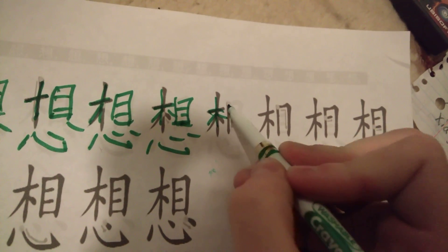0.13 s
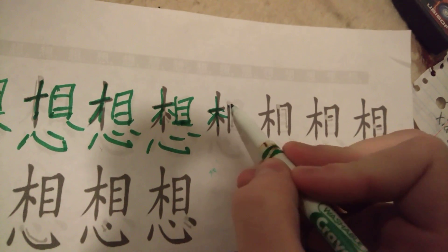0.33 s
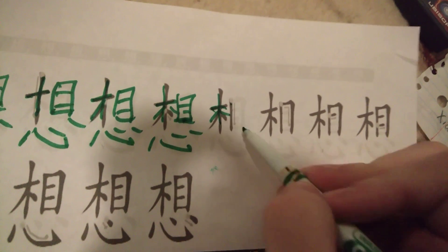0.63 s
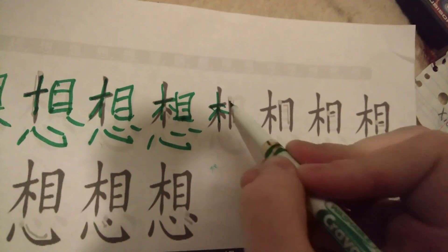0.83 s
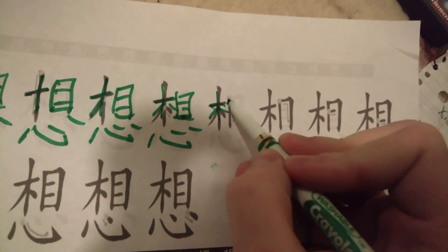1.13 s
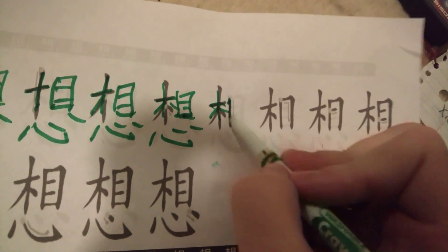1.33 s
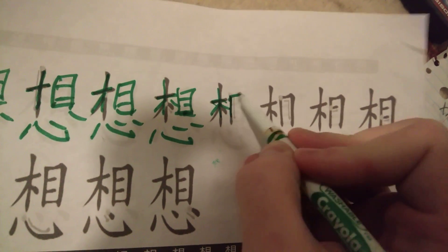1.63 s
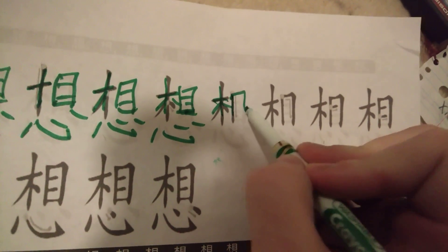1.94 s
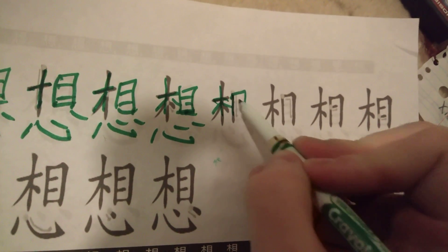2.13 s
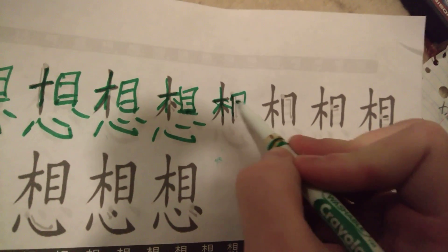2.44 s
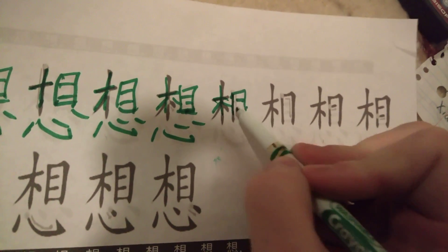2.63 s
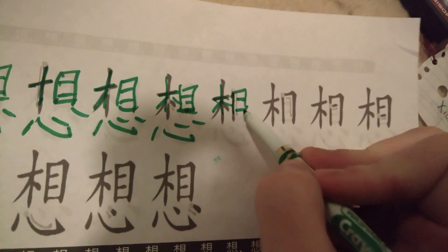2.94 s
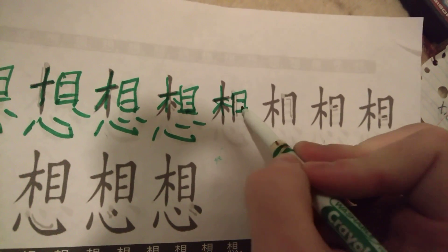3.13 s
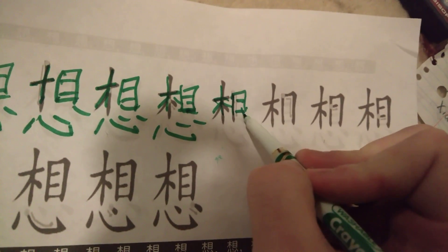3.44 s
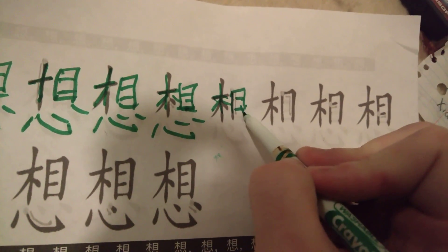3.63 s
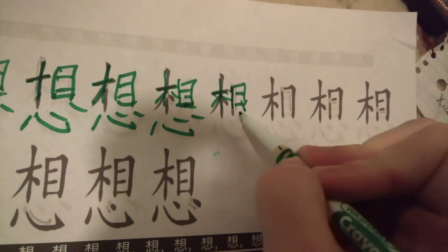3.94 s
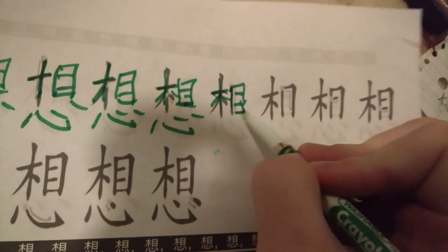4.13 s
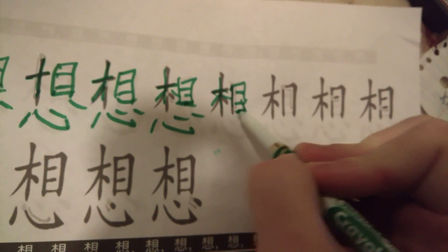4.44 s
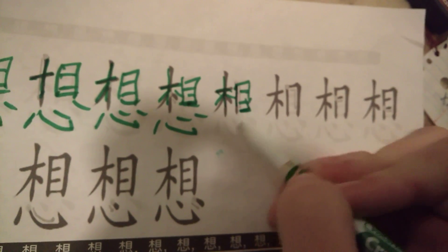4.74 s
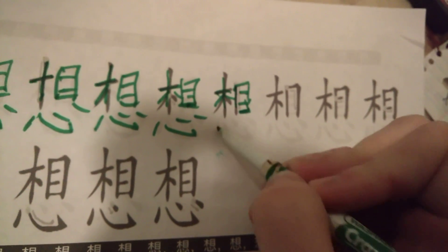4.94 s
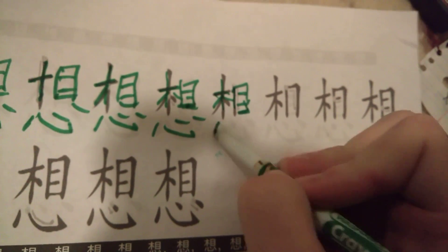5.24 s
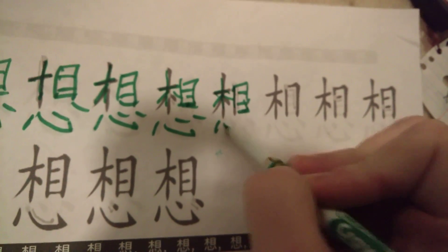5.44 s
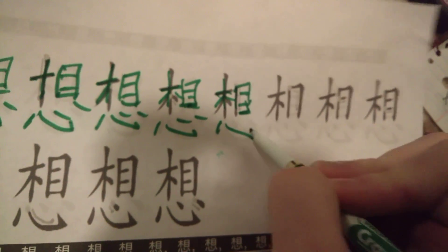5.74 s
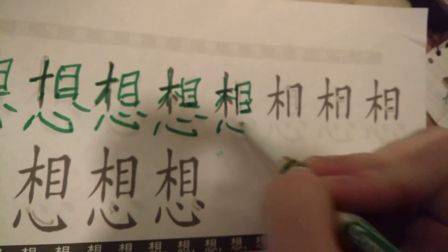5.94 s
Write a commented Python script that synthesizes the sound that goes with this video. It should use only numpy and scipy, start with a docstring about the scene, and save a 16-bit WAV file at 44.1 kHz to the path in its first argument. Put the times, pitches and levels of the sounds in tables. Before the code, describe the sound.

In a quiet room, close and to the left of the microphone, a marker scratches across paper in brief, uneven strokes. The first few are clear, the middle ones lighter and now and then juddering, and the last ones duller, with crisp taps of the tip. Between strokes the side of a hand slides over the sheet with a soft hiss, above a faint low hum.

```python
"""Felt-tip marker on paper

A marker writes a character in short strokes on a sheet lying on a desk. Its tip catches on the
fibres and shakes the sheet, now and then chattering. The side of the hand slides over the paper
with a soft hiss, and tip and sheet tick. All is close to the left microphone, in a quiet room."""
import sys
import numpy as np
from scipy import signal
from scipy.fft import rfft, irfft, next_fast_len
from scipy.io import wavfile
from scipy.ndimage import uniform_filter1d

SR = 44100
rng = np.random.default_rng(int(sys.argv[2]) if len(sys.argv) > 2 else 0)


def generate_wav(signal):
    """Clip the signal to [-1, 1] and save it as 16-bit WAV at the path in sys.argv[1]."""
    frames = np.transpose(np.atleast_2d(signal))
    scaled = np.clip(frames, -1, 1) * 32767
    pcm = np.round(scaled).astype(np.int16)
    wavfile.write(sys.argv[1], SR, pcm)


N = 268286
TIME = np.arange(N) / SR

# Levels in the tables are relative: later gains set the final loudness.
# marker strokes: t/s, speeding up/s, slowing/s, level/dB, brightness/(dB per octave),
# pressure on the desk/dB, fibre hiss/dB, chatter/(0-1)
MARKER_STROKES = [(1.146, 0.019, 0.098, -54.5, -6, -0.5, -20, 0.13),
                  (1.299, .072, 0.054, -31.5, 0, -13.5, -8.5, 0),
                  (1.646, 0.011, 0.088, -37, 7, -11.5, -5.5, 0.13),
                  (1.759, 0.081, 0.068, -30.5, -1, -12, -6.5, 0),
                  (1.934, 0.0066, 0.037, -52, -12, 7, 2.5, 0.1),
                  (2.475, 0.021, 0.06, -38.5, 0.5, -6, -8.5, 0.47),
                  (2.771, 0.039, 0.099, -43.5, 1, -6.5, -7, 0.75), (3.2, 0.1, 0.044, -51, -6, 0, -25, 0.06),
                  (3.367, .027, .023, -55, 1, -2.5, -8, 0), (3.43, 0.027, 0.042, -56, -1, 3.5, -5.5, 0),
                  (4.138, 0.035, 0.071, -41.5, 1.5, -2, -1, 0.7),
                  (4.237, 0.0336, 0.055, -44, -7, 4, -0.5, 0.71),
                  (4.332, 0.042, 0.033, -50, 2, 5.5, -3.5, 0),
                  (4.421, 0.035, 0.025, -43, 1, -10, 0.5, 0.12),
                  (4.556, 0.033, 0.044, -45, -0.5, -0.5, -0.5, 0.2),
                  (5.172, 0.04, 0.027, -51, -8, -10.5, 3.5, 0.03),
                  (5.237, .03, 0.074, -43, -11.5, -2.5, 7.5, 0.37),
                  (5.432, 0.12, 0.067, -37.5, -6, -1, 2.5, 0.18),
                  (5.575, 0.039, 0.061, -45, -7.5, -0.5, -3.5, 0.2),
                  (5.7033, 0.0027, 0.018, -32.5, -6, -3.5, -3, 0.2),
                  (5.715, 0.015, 0.057, -33.5, -12.5, 0, -3.5, 0.04)]
# pitches at which the sheet and marker ring: f/Hz, width/Hz, level/dB
SHEET_RESONANCES = [(913, 350, -2.5), (1172, 136, 3.5), (1410, 710, 2), (1750, 400, -3.5), (2313, 250, -6),
                    (2770, 440, -15), (3300, 88, -6), (4480, 120, -7)]
# the desk ringing under a pressed tip: f/Hz, width/Hz, level/dB
DESK_RESONANCES = [(246, 230, -9), (363, 124, 4), (447, 96, 4.5), (531, 126, -4)]
# tone of the hissing fibres: f/Hz, level/dB
FIBRE_TONE = [(1500, -18), (3000, 1.5), (4100, 0.5), (4700, -5.5), (5500, 2.5), (6000, -1.5), (6600, -0.5),
              (7500, 0), (8700, -1), (10300, 0), (11200, -13), (13500, -7.5), (16000, -14)]
# tone of the felt nib's own high ring: f/Hz, level/dB
NIB_TONE = [(7000, -11), (8800, -39), (9500, 4.5), (10100, 3), (10500, 2), (10900, -8), (11600, -5),
            (13500, -10), (14800, -12), (16000, -14)]
# ticks of tip and sheet: t/s, level/dB, f/Hz
PAPER_TICKS = [(.105, -47, 3400), (1.063, -32, 1900), (1.6177, -14, 2480), (1.891, -38, 6960),
               (1.939, -34, 1450), (3, -41.5, 4350), (3.349, -37, 3900), (3.433, -41.5, 3300),
               (3.984, -27.5, 4760), (4.496, -37.5, 4960), (4.61, -30.5, 4410), (4.7167, -36.5, 2660),
               (4.881, -42, 2740), (5.208, -25.5, 1867), (5.361, -27.5, 1760), (5.442, -27.5, 1990),
               (5.474, -28.5, 1900), (5.5089, -19.5, 1570), (5.5343, -9, 2400), (5.5349, -9, 2050),
               (5.5369, -14, 1586), (5.7245, -15, 1330), (5.864, -32.5, 2650), (5.9405, -31, 1860)]
# the hand slides to a new place: t/s, length/s, level/dB
HAND_SLIDES = [(0.16, 0.14, -56.5), (0.43, 0.076, -58.5), (0.534, 0.17, -45.5), (0.67, 0.4, -51),
               (0.953, .14, -48.5), (1.057, 0.092, -53.5), (1.146, 0.095, -50.5), (1.28, 0.2, -45),
               (1.374, 0.25, -51), (1.551, 0.29, -47.5), (1.888, 0.26, -47.5), (2.086, 0.21, -55),
               (2.282, 0.11, -44.5), (2.41, 0.17, -52.5), (2.516, 0.18, -50), (2.689, 0.33, -45.5),
               (3.082, 0.39, -48.5), (3.781, 0.18, -52), (3.946, 0.091, -59.5), (4.063, 0.16, -44.5),
               (4.208, 0.59, -53.5), (4.488, 0.074, -47.5), (4.599, 0.23, -49), (4.802, 0.12, -50.5),
               (4.997, 0.23, -53), (5.143, 0.18, -44.5), (5.326, 0.078, -43.5), (5.429, .12, -48),
               (5.587, 0.48, -47), (5.985, 0.18, -42)]
# tone of skin rubbing on paper: f/Hz, level/dB
SKIN_TONE = [(200, -14), (700, -14.5), (1000, -11.5), (1500, -1.5), (2350, 1), (3100, -2), (3900, -5.5),
             (5500, -4.5), (7500, -9), (10600, -8.5), (12000, -15), (16000, -18.5)]
# the hand shifts its weight: t/s, half length/s, level/dB
HAND_BUMPS = [(2.85, .06, -60), (3.297, 0.14, -57.5), (3.787, 0.038, -55), (5.738, 0.098, -60)]
# the desk ringing under the hand: f/Hz, width/Hz, level/dB
BUMP_RESONANCES = [(66, 40, 0), (256, 78, -2.5), (366, 99, -7)]
# tone of the room's rumble: f/Hz, level/dB
ROOM_TONE = [(25, -11.5), (50, -3.5), (85, -3.5), (160, -7), (330, -8), (500, -16.5), (950, -22.5),
             (1700, -24), (3900, -30), (5400, -27), (8000, -36), (15000, -39)]
# muffling on the way from the desk to the right microphone: f/Hz, level/dB
RIGHT_SHADE = [(100, 0), (380, -30), (700, -15.5), (1300, -28), (2400, -23), (4400, -23), (8100, -51),
               (15000, -41)]

REST_DB = -66.5  # the hand is never quite still


def marker(lean_db=3.5, dull_db=1.5, hiss_power=1.4):
    """The tip catches on fibres and shakes sheet, desk and nib; a faster tip sounds brighter."""
    pace, drag, brightness, press, hiss, sheen, judder = np.zeros((7, N))
    for start, rise, fall, db, bright_db, press_db, hiss_db, chatter_amount in MARKER_STROKES:
        span, speed = stroke_speed(start, rise, fall)
        lean = undb(lean_db * np.linspace(-1, 1, len(speed)))  # starts light and hissy, ends pressed
        scratch = speed ** hiss_power * undb(db) / lean
        pace[span] = speed
        drag[span] += speed * undb(db)
        brightness[span] = bright_db - dull_db * (1 - speed)
        press[span] += speed * undb(db + press_db) * lean
        hiss[span] += scratch * undb(hiss_db)
        nib_db = hiss_db - 6.5 + 0.79 * bright_db  # the nib rings more in bright strokes
        sheen[span] += scratch * np.hypot(undb(nib_db), chatter_amount * undb(-1.5))
        judder[span] += speed ** 2 * undb(db) * chatter_amount * lean
    # fibres let go in little bunches, which makes the rub gritty
    bunches = stick_slip(rate=980, spread_db=24.0, release_s=0.00068)
    force = unit(3.0 + bunches) * undb(0.68 * wander(150))
    grip = unit((catches(rate=9000, spread_db=2.0) + 0.24 * noise()) * force)
    # each resonance is shaken by its own share of the fibres
    rings = [undb(db) * ring(grip + 2.37 * noise() * force, hz, width)
             for hz, width, db in SHEET_RESONANCES]
    sheet = sum(part * undb(brightness * np.log2(hz / 1600))
                for part, (hz, _, _) in zip(rings, SHEET_RESONANCES))
    sheet = sheet - ring(sheet, 4000, 710)  # the sheet is quiet between its upper resonances
    sheet = highpass(sheet, 670) / np.std(sum(rings)) * drag * undb(1.7)
    desk = unit(highpass(body(grip, DESK_RESONANCES), 250)) * press * undb(-3.5)
    fibres = unit(colour(grip + .5 * noise(), FIBRE_TONE)) * hiss * undb(0.23)
    nib = unit(colour(noise() * force, NIB_TONE)) * sheen * undb(1.5)
    return sheet + desk + fibres + nib + chatter(pace) * judder * undb(3.0)


def stroke_speed(start, rise, fall, full_speed_share=0.12):
    """The tip speeds up, holds its pace and slows. Gives the stroke's samples and its speed, 0-1."""
    ramp = 1 - full_speed_share
    end = start + rise + fall
    span = slice(int(start * SR), int(end * SR))
    outline = np.interp(TIME[span], [start, start + ramp * rise, end - ramp * fall, end], [0, 1, 1, 0])
    return span, np.sin(np.pi / 2 * outline) ** 2


def chatter(pace, full_speed_hz=545):
    """The tip sticks and slips, ringing the marker's barrel; the rate wavers and sags as it slows."""
    slip_hz = full_speed_hz * (1 - .15 * (1 - pace) + .11 * wander(220))
    cycles = np.floor(np.cumsum(slip_hz) / SR)
    slips = np.diff(cycles, prepend=0) * undb(4.6 * wander(90))
    return unit(ring(slips, 510, 180))


def catches(rate, spread_db):
    """Fibres catch and let go at random, a few much harder than the rest."""
    size = undb(spread_db * np.minimum(rng.exponential(size=N), 4))
    return unit((rng.random(N) < rate / SR) * size * np.sign(noise()))


def stick_slip(rate, spread_db, release_s):
    """The force on the paper jumps at uneven moments and fades quickly each time."""
    slips = (rng.random(N) < rate / SR) * undb(spread_db * (2 * rng.random(N) - 1))
    return unit(signal.lfilter([1], [1, -np.exp(-1 / (release_s * SR))], slips))


def ticks(crack_s=0.00095, rattle=0.26):
    """The sheet flexes with a short, crisp crack and rattles briefly on the desk."""
    out, t = np.zeros(N), TIME[:SR // 20]
    for start, db, hz in PAPER_TICKS:
        # higher ticks are crisper; a firm tap pins the sheet, so it cracks and rattles less
        octaves, firm_db = np.log2(hz / 2000), db + 30
        crisp_db = -15 + 9 * octaves - 0.73 * firm_db
        rattle_s = 0.0032 / 2 ** (octaves + firm_db / 10.5)
        grit = rng.standard_normal((2, len(t)))
        push = (t == 0) + rattle * grit[0] * np.exp(-t / rattle_s)
        treble_cut = signal.butter(4, min(1.51 * hz, .45 * SR), fs=SR)
        flex = signal.lfilter(*treble_cut, highpass(ring(push, hz, width=hz), hz / 2))
        flex = flex - ring(flex, 4050, 620)  # the gap between the sheet's upper resonances
        crack = highpass(grit[1], 3700) * np.exp(-t / crack_s)
        tick = undb(db) * (flex / abs(flex).max() + undb(crisp_db) * crack / abs(crack).max())
        i = int(start * SR)
        out[i:i + len(t)] += tick[:N - i]
    return out


def hand_rub():
    """Skin brushes paper with a soft hiss; even a resting hand makes the sheet crackle faintly."""
    slide_db = 20 * np.log10(hand_motion())
    grain = noise() + .5 * catches(rate=2500, spread_db=4)
    flicker_db = 1.6 * wander(50) + 1.33 * wander(250)
    hiss = unit(colour(grain, SKIN_TONE)) * undb(slide_db + flicker_db - 0.67)
    snaps = noise() * stick_slip(rate=35, spread_db=5, release_s=.0009)
    crackle_db = -70.0 + 0.31 * (slide_db - REST_DB)
    crackle = unit(ring(colour(snaps, SKIN_TONE), 7000, 6400)) * undb(crackle_db)
    return hiss + crackle


def hand_motion(peak_at=0.33, sharpness=2.9):
    """How hard the hand rubs: each slide is fastest early on, then coasts to a stop."""
    power = np.full(N, undb(REST_DB) ** 2)
    for start, length, db in HAND_SLIDES:
        span = slice(int(start * SR), int((start + length) * SR))
        done = np.clip((TIME[span] - start) / length, 0, 1)
        speed = (done / peak_at) ** peak_at * ((1 - done) / (1 - peak_at)) ** (1 - peak_at)
        power[span] += (undb(db) * speed ** sharpness) ** 2
    return np.sqrt(power)


def hand_bumps():
    """The heel of the hand rolls on the desk with a dull rumble."""
    swell = sum(undb(db) * np.exp(-((TIME - middle) / half) ** 2) for middle, half, db in HAND_BUMPS)
    return unit(body(noise(), BUMP_RESONANCES)) * swell


def echoes(x, fade_s):
    """Many tiny reflections blur together and die away by 60 dB in fade_s seconds."""
    t = TIME[:SR // 2]
    response = rng.standard_normal(len(t)) * np.exp(-np.log(1000) * t / fade_s) * (t > .001)
    return signal.fftconvolve(x, response / np.linalg.norm(response))[:N]


def quiet_room():
    """A low rumble, a wavering mains hum and a faint whine, for left and right."""
    shared, left, right = (unit(colour(noise(), ROOM_TONE)) for _ in range(3))
    hum = undb(-65) * np.sin(2 * np.pi * 120 * TIME + 0.31 * wander(5.2)) * undb(2.76 * wander(8))
    whine = undb(-72.5) * unit(ring(noise(), 2367, 78))
    low = signal.sosfilt(signal.butter(1, 300, fs=SR, output="sos"), shared)
    rumble_gain = undb(-61.5)
    return np.array([rumble_gain * (0.65 * shared + 0.42 * left) + hum + whine,
                     rumble_gain * (0.25 * low + 0.46 * highpass(right, 150)) + 0.13 * hum])


def undb(db):
    """Turn decibels into a number to multiply by."""
    return np.exp(np.asarray(db) * np.log(10) / 20)


def unit(x):
    """Scale a signal to an average strength (rms) of 1."""
    return x / np.sqrt(np.mean(x ** 2))


def noise():
    """White noise: a plain, even hiss."""
    return rng.standard_normal(N)


def wander(rate):
    """A smooth random drift that takes a new course `rate` times a second."""
    step = int(SR / rate)
    stairs = np.repeat(rng.standard_normal(N // step + 1), step)
    return unit(uniform_filter1d(stairs, step)[:N])


def colour(x, points):
    """Shape the tone along a curve of f/Hz, level/dB points."""
    hz, db = np.transpose(points)
    size = next_fast_len(N + SR // 10, real=True)
    f = np.maximum(np.arange(size // 2 + 1) * SR / size, 1)
    gain = undb(np.interp(np.log(f), np.log(hz), db))
    return irfft(rfft(x, size) * gain)[:N]


def ring(x, hz, width):
    """One resonance: it keeps the sound near hz, and a narrower one rings longer."""
    return signal.lfilter(*signal.iirpeak(hz, hz / width, fs=SR), x)


def body(x, resonances):
    """An object ringing at several pitches at once, with every second one flipped in sign."""
    return sum((-1) ** k * undb(db) * ring(x, hz, width) for k, (hz, width, db) in enumerate(resonances))


def highpass(x, hz):
    """Turn down the sound below hz."""
    return signal.sosfilt(signal.butter(2, hz, "high", fs=SR, output="sos"), x)


def scene(lag_samples=16):
    """The writing reaches the left microphone directly, the right one later and muffled."""
    writing = marker() + hand_rub() + ticks() + hand_bumps()
    desk_echo = undb(-20.5) * echoes(writing, fade_s=0.095)
    room_echo = undb(-19.5) * echoes(writing, fade_s=0.29)
    left = 0.91 * writing + desk_echo + room_echo
    delayed = np.pad(writing, (lag_samples, 0))[:N]
    right = 0.22 * np.pad(left, (lag_samples, 0))[:N]
    right += 0.73 * echoes(writing, fade_s=0.042) + 0.25 * echoes(writing, fade_s=0.27)
    return np.array([left, colour(right, RIGHT_SHADE)]) + quiet_room()


def record(dry, top_hz=15800):
    """Cut away the highest treble."""
    return signal.sosfilt(signal.ellip(10, .2, 70, top_hz, fs=SR, output="sos"), dry, axis=-1)


dry = scene()
out = record(dry)
generate_wav(out)
```